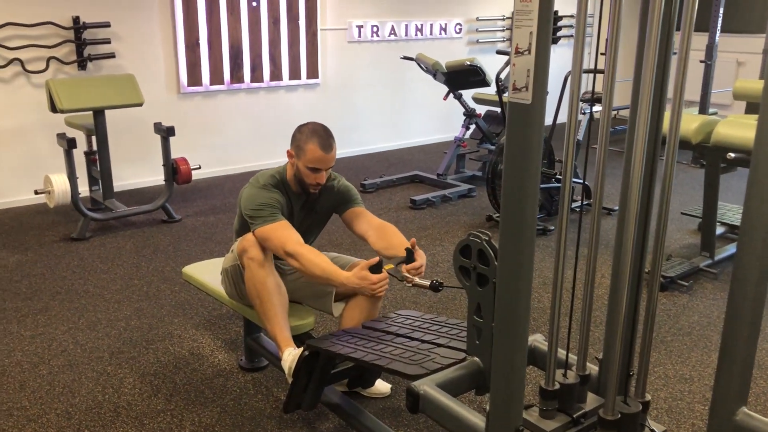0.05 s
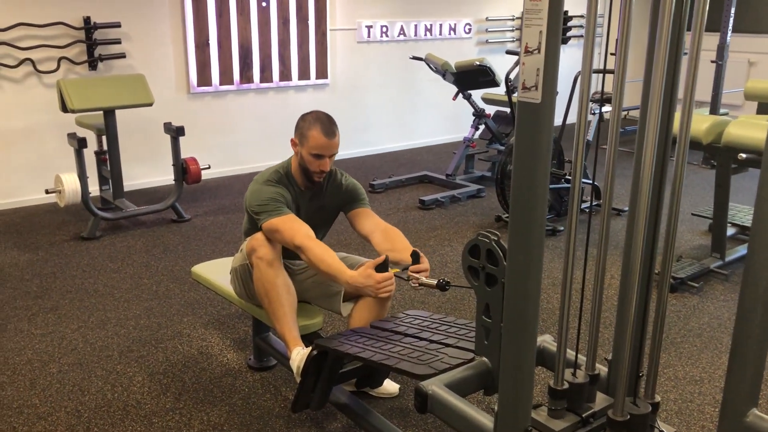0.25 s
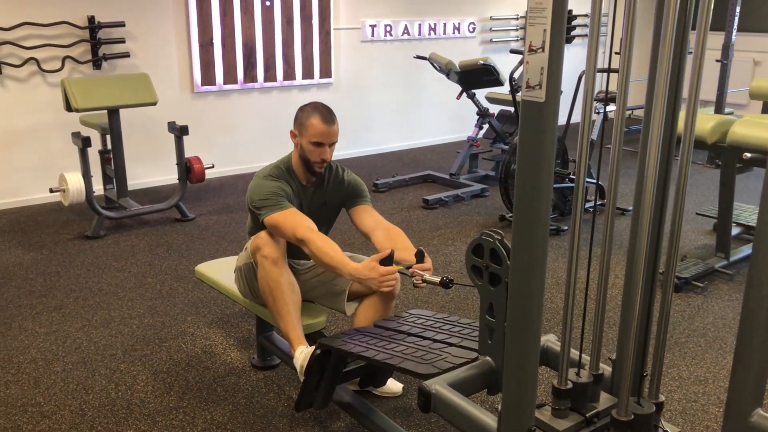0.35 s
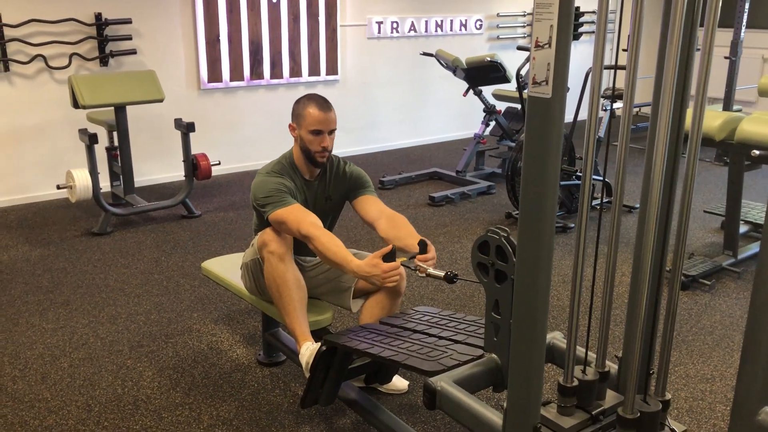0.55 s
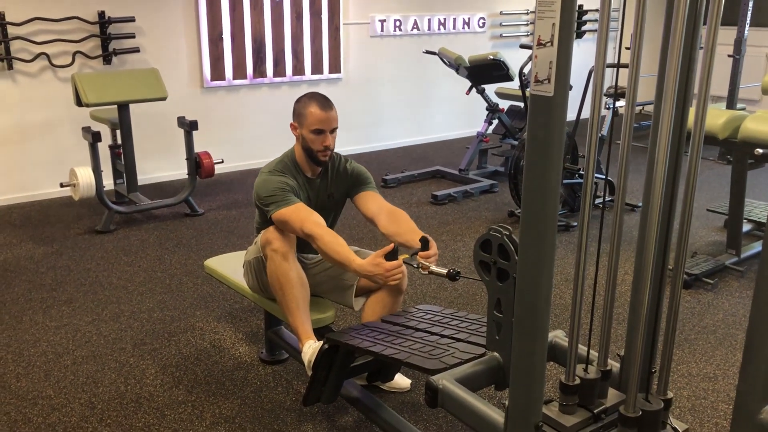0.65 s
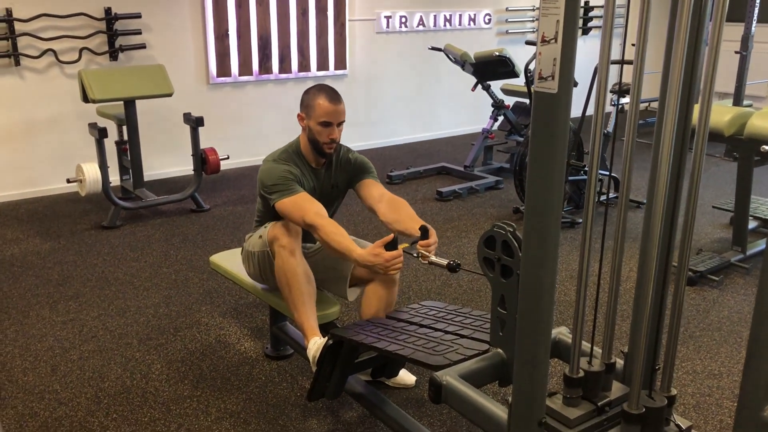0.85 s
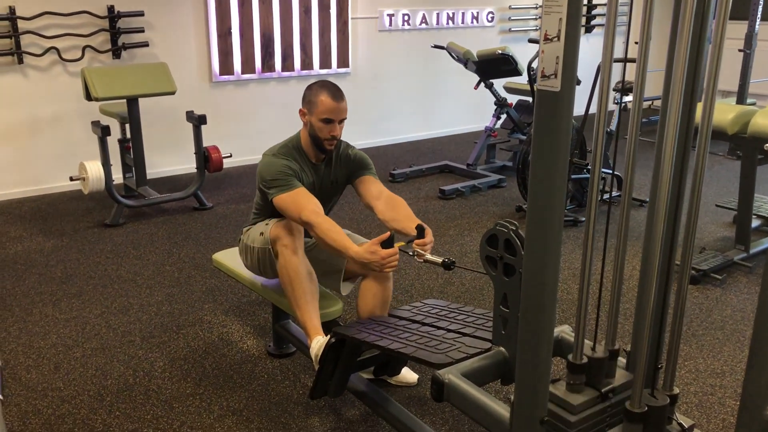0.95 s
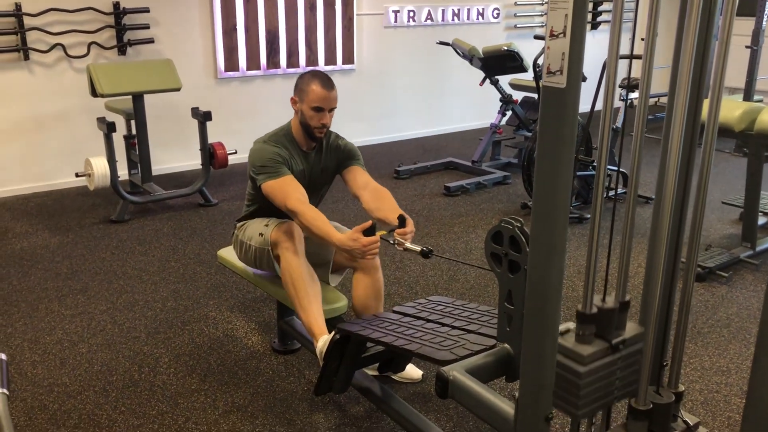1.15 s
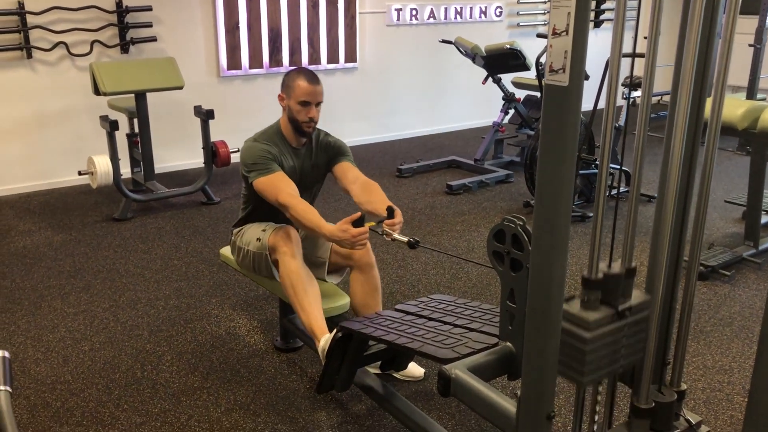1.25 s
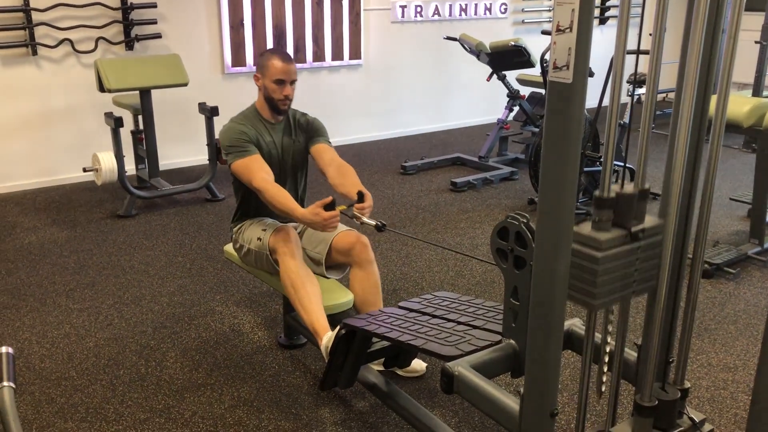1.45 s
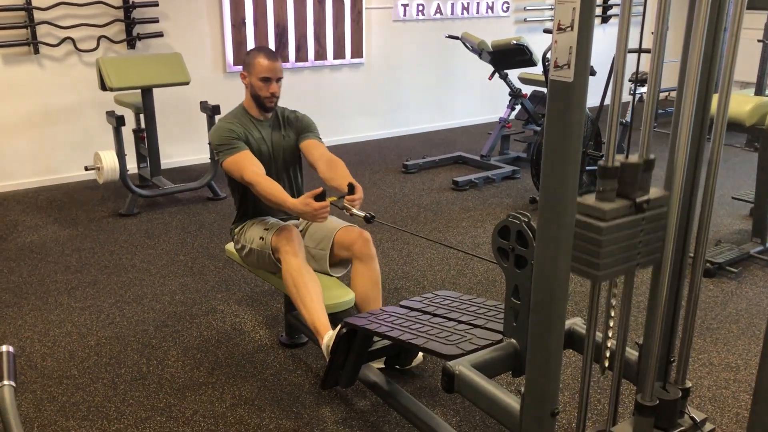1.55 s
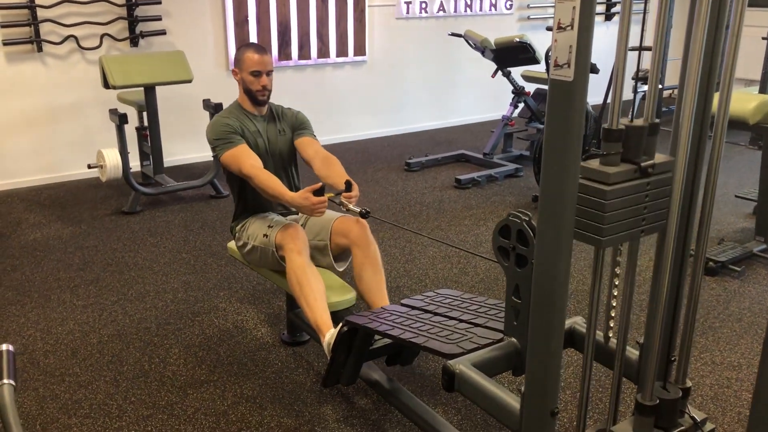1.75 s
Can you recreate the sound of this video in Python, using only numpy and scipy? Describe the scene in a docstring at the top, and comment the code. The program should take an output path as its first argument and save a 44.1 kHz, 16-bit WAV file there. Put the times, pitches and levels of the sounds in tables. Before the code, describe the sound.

A steel weight stack clanks once at about 0.2 seconds, with a tiny tick just before it and a low thud beneath. The metal rings and fades through a large gym over roughly a second. Faint, dull knocks follow near 0.9 and 1.3 seconds, with a light sliding hiss as the stack rises. A low, wavering ventilation hum runs throughout, until about 1.8 seconds.

```python
"""Cable row in a large gym

As the cable tightens, the selector pin ticks in its hole, then catches the steel weight stack:
one clank that rings in the frame and dies away in the hall. The stack rises with a few soft
knocks and a light sliding hiss. A low, wavering room hum runs under it all."""
import sys
import numpy as np
from scipy import signal
from scipy.fft import rfft, irfft
from scipy.io import wavfile

SR = 44100
rng = np.random.default_rng(int(sys.argv[2]) if len(sys.argv) > 2 else 0)


def unload_wav(signal):
    """Save mono or channel-first audio to the path in sys.argv[1] as 16-bit WAV at rate SR, clipped to [-1, 1]."""
    wavfile.write(
        sys.argv[1],
        SR,
        np.round(np.clip(np.atleast_2d(signal).T, -1, 1) * 32767).astype(np.int16),
    )


N = 79380
T = np.arange(N) / SR  # time of each sample [s]
FREQS = np.arange(N // 2 + 1) * SR / N  # frequencies in a spectrum [Hz]


def from_db(db):
    """Turn decibels into a number to multiply by."""
    return 10 ** (np.asarray(db) / 20)


def at_hz(table, hz):
    """Read between a table's rows, giving every octave equal room."""
    freqs, values = np.transpose(table)
    return np.interp(np.log(np.maximum(hz, 1)), np.log(freqs), values)


def noise(colour):
    """Noise of strength 1; its colour says how strong the lows and highs are."""
    x = irfft(rfft(rng.standard_normal(N)) * from_db(at_hz(colour, FREQS)), N)
    return x / x.std()


def between(x, low_hz, high_hz, order=1):
    """Soften what lies outside a band, then set the strength to 1."""
    for hz, kind in ((low_hz, "high"), (high_hz, "low")):
        x = signal.sosfilt(signal.butter(order, hz, kind, fs=SR, output="sos"), x)
    return x / x.std()


def rise(seconds, start=0):
    """A sound takes a moment to build up."""
    return 1 - np.exp(-np.maximum(T - start, 0) / seconds)


def fade(seconds, start=0):
    """Start suddenly, then drop 60 dB in the given fade time."""
    return (T >= start) * np.exp(-np.log(1000) * np.maximum(T - start, 0) / seconds)


def convolve(x, response):
    """Let every sample of a sound set off the response of an object or room."""
    return signal.fftconvolve(x, response)[:N]


def blows(rows):
    """One click for each (time [s], level [dB])."""
    x = np.zeros(N)
    for start, db in rows:
        x[int(start * SR)] += from_db(db)
    return x


def ringing(tones):
    """A struck object rings with its own tones, each fading at its own pace."""
    return sum(from_db(db) * fade(fade_s) * np.sin(2 * np.pi * hz * T) * rng.choice([-1, 1])
               for hz, db, fade_s in tones)


# how the hum wavers: (time [s], level [dB], pitch [Hz])
HUM_PATH = [(0.0, -63, 170), (0.04, -52, 178), (0.164, -53.5, 168), (0.214, -41, 171.8),
            (0.27, -54.5, 172.5), (0.32, -38, 169.7), (0.36, -57, 170.6), (0.45, -55.5, 179.4),
            (0.54, -43.5, 167.7), (0.742, -62.5, 172.5), (0.762, -43, 170.1), (0.912, -43.5, 171.2),
            (0.996, -51.5, 180), (1.132, -50.5, 182.2), (1.222, -46, 170.1), (1.508, -43, 170.3),
            (1.648, -52.5, 172.6), (1.8, -47, 169.9)]
# colour of the ventilation: (frequency [Hz], relative level [dB])
AIR_COLOUR = [(20, -58), (33, -36), (45, -2.5), (60, -2), (85, 0), (103, -5.5), (130, 3), (190, 1),
              (240, -7), (320, -14), (460, -21), (515, -15.5), (600, -22.5), (920, -24.5), (1080, -20),
              (1300, -27), (2500, -34), (6000, -44), (15000, -53)]

def room_hum():
    """A low tone wavers and flutters amid the ventilation's rumble and hiss."""
    times, db, hz = np.transpose(HUM_PATH)
    flutter_hz, flutter_db = 24.43, 1.66
    flutter = np.interp(T * flutter_hz, np.arange(N), rng.standard_normal(N))
    level = from_db(np.interp(T, times, db) + flutter_db * flutter)
    tone = np.sqrt(2) * np.sin(2 * np.pi * np.cumsum(np.interp(T, times, hz)) / SR)
    return level * tone + from_db(-49) * noise(AIR_COLOUR)


# the pin touches its hole: (time [s], strength [dB])
PIN_TOUCHES = [(0.2207, -35), (0.2295, -30.5)]
# the pin's own tones: (pitch [Hz], relative level [dB], fade time [s])
PIN_TONES = [(1850, -26, 0.13), (3590, -9.5, .06), (4730, -16, .07), (7730, 0.5, 0.043), (10600, -9, .04),
             (11230, -23, 0.028)]
# colour of its scuff: (frequency [Hz], relative level [dB])
SCUFF_COLOUR = [(500, 3), (1700, 2), (2200, -5), (3500, -2), (7500, 0), (11000, -1), (15500, -17)]

def pin():
    """Taking up its slack, the pin scuffs and rings twice, harder the second time."""
    scuff_level = sum(from_db(db - 9) * fade(0.084, start) for start, db in PIN_TOUCHES)
    ring = convolve(blows(PIN_TOUCHES), ringing(PIN_TONES))
    return scuff_level * noise(SCUFF_COLOUR) + ring


# the plates clash: (time [s], strength [dB], thin below [Hz], dull above [Hz])
CLASHES = [(0.2334, -2.5, 7000, 15100), (0.2352, -1.5, 900, 10800), (0.2369, -9.5, 150, 2000),
           (0.2396, -4, 400, 5970), (0.2498, -4.5, 300, 6000)]
# colour of their clatter: (frequency [Hz], relative level [dB])
CLATTER_COLOUR = [(200, 2.5), (400, -8.5), (750, 3.5), (1300, 0), (1750, 7.5), (2130, -44), (2650, 1),
                  (3400, 6), (3950, 0.5), (4450, 7.5), (5300, -1), (7000, -1), (7400, -13), (8150, 1),
                  (9100, -14), (10400, 0), (10900, -1.5), (11500, 0.5), (12900, -11), (15500, -9)]

def plate_clatter():
    """Steel meets steel: each clash is a sharp crack and a short, dense clatter."""
    sound = np.zeros(N)
    for start, db, low_hz, high_hz in CLASHES:
        crack = from_db(2) * fade(0.0053, start)
        level = from_db(db - 23) * rise(0.00028, start) * (crack + fade(0.061, start))
        sound += level * between(noise(CLATTER_COLOUR), low_hz, high_hz)
    return sound


# how long the hall echoes: (frequency [Hz], fade time [s])
HALL_FADES = [(300, 1.96), (1600, 1.19), (4000, 1.32), (6000, 0.81), (8000, 0.62), (11000, 0.38),
              (15000, 0.55)]

def hall_echo(colour):
    """Countless reflections build up, then die away, the treble first."""
    spectrum = rfft(noise(colour))
    centres = np.geomspace(250, 16000, 19)
    echo = np.zeros(N)
    for hz, share in zip(centres, np.eye(len(centres))):
        band = irfft(spectrum * np.interp(FREQS, centres, share), N)
        echo += band * fade(at_hz(HALL_FADES, hz))
    return echo * rise(0.0023)


def in_hall(x, echo_db):
    """A sound together with its echo in the hall."""
    echo = hall_echo([(1, 0), (SR, 0)])  # starts with lows and highs equally strong
    return x + from_db(echo_db) * convolve(x, echo / np.linalg.norm(echo))


# tones of the stack and frame: (pitch [Hz], relative level [dB], fade time [s])
FRAME_TONES = [(419, -4, .58), (540, -17, .9), (690, -12, .8), (812, -12, 1.1), (1110, -12, .9),
               (1564, -6, .8), (1669, -2, .62), (1700, 2, .62), (1769, 0, .45), (2380, -14, 1.0),
               (2536, -8, 1.0), (2652, -7, .6), (2864, -5, .5), (3436, -4, .75), (3510, -7, .7),
               (4200, -8, .8), (4299, -3, .65), (4350, 2, .72), (4557, -2, .55), (4864, -5, .35),
               (5930, -13, .8), (8115, -8, .45)]
# colour of the hall's answer to the clank: (frequency [Hz], relative level [dB])
ECHO_COLOUR = [(250, -15), (480, -7), (720, 3), (950, -4), (1400, -1.5), (1700, 10), (1870, -8),
               (2150, -10), (2600, 1), (3550, 5), (3950, -6), (4300, 4.5), (5100, -0.5), (5650, -2),
               (6900, -0.5), (8100, -2.5), (9200, -8.5), (11300, -4), (13000, -15), (15500, -20)]

def frame_ring():
    """The hardest clash sets the stack and frame ringing and fills the hall."""
    start, db, _, _ = max(CLASHES, key=lambda row: row[1])
    ring = from_db(-39) * in_hall(ringing(FRAME_TONES), echo_db=-10.5)
    echo = from_db(-32.5) * hall_echo(ECHO_COLOUR)
    return convolve(blows([(start, db)]), ring + echo)


def floor_thud():
    """The machine's base and the floor answer a moment later with a low thud."""
    start, hz = 0.245, 81.2
    level = from_db(-36.5) * rise(0.015, start) * fade(0.34, start)
    return level * np.sin(2 * np.pi * hz * (T - start))


# how the sliding grows: (time [s], level [dB])
SLIDE_LEVEL = [(0, -72.5), (0.8, -65), (1.0, -64), (1.3, -65.5), (1.48, -61), (1.58, -66.5), (1.71, -59.5),
               (1.8, -62)]
# colour of the sliding: (frequency [Hz], relative level [dB])
SLIDE_COLOUR = [(200, 9.5), (510, 3.5), (680, -10), (900, -6.5), (1100, -6), (1400, -5.5), (2200, -5),
                (4000, -9), (8000, -18.5), (15000, -24.5)]

def sliding():
    """The stack slides on its guide rods; the hiss grows from almost nothing."""
    times, db = np.transpose(SLIDE_LEVEL)
    return from_db(np.interp(T, times, db)) * noise(SLIDE_COLOUR)


# knocks of the moving stack: (time [s], strength [dB], dull above [Hz])
KNOCKS = [(0.929, -45.5, 3200), (0.9506, -50.5, 2196), (0.975, -51, 1597), (1.327, -54.5, 700),
          (1.339, -53.5, 700)]
# colour of a knock: (frequency [Hz], relative level [dB])
KNOCK_COLOUR = [(250, -9), (520, 1), (1100, 0.5), (1600, -5.5), (2600, -4.5), (4000, -17), (8000, -17.5),
                (15000, -32)]

def stack_knocks():
    """Padded contacts in the rising stack make soft, dull knocks that echo in the hall."""
    sound = np.zeros(N)
    for start, db, high_hz in KNOCKS:
        level = from_db(db) * rise(0.001, start) * fade(0.051, start)
        sound += level * between(noise(KNOCK_COLOUR), 100, high_hz)
    return in_hall(sound, echo_db=-3)


# colour of the tick: (frequency [Hz], relative level [dB])
TICK_COLOUR = [(2500, -20), (3700, 4), (4900, 2), (7000, -14), (11000, -9), (13500, -18), (15500, -22)]

def cable_tick():
    """The cable gives one light tick."""
    return from_db(-58.5) * fade(0.046, start=1.2105) * noise(TICK_COLOUR)


# brief rubs: (peak time [s], width [s], level [dB], thin below [Hz], dull above [Hz])
RUBS = [(1.632, 0.032, -74.5, 10970, 15000), (1.715, 0.023, -68, 2800, 4900)]

def stack_rubs():
    """The rising stack rubs twice, each a quick swell of brighter hiss."""
    sound = np.zeros(N)
    for peak, width, db, low_hz, high_hz in RUBS:
        swell = np.exp(-0.5 * ((T - peak) / width) ** 2)
        sound += from_db(db) * swell * between(rng.standard_normal(N), low_hz, high_hz, order=2)
    return sound


def scene():
    """The machine and the room, added into one channel."""
    catch = pin() + plate_clatter() + frame_ring() + floor_thud()
    lift = sliding() + stack_knocks() + cable_tick() + stack_rubs()
    return (catch + lift + room_hum())[None]


def record(dry):
    """Cut off the very highest treble steeply."""
    cutoff_hz = 15750
    return signal.sosfilt(signal.ellip(12, .1, 80, cutoff_hz, fs=SR, output="sos"), dry)


dry = scene()
out = record(dry)
unload_wav(out)
```